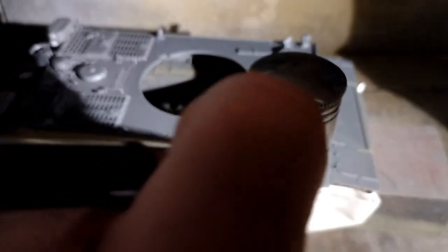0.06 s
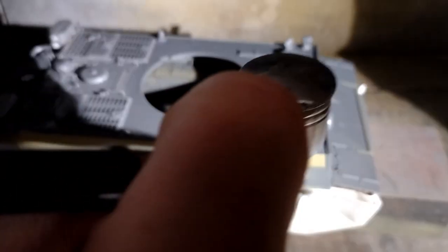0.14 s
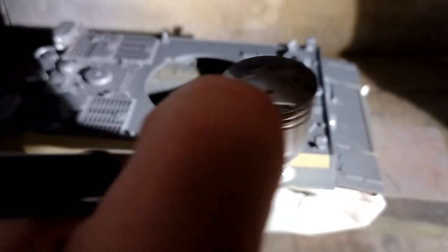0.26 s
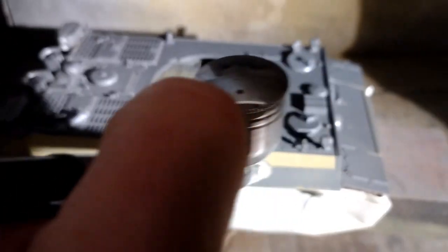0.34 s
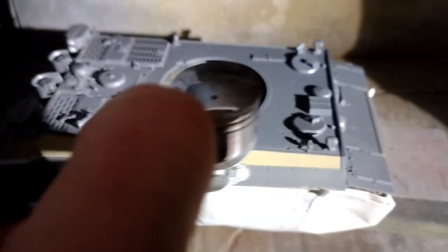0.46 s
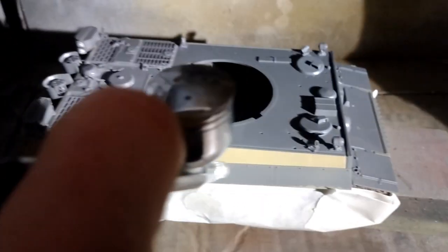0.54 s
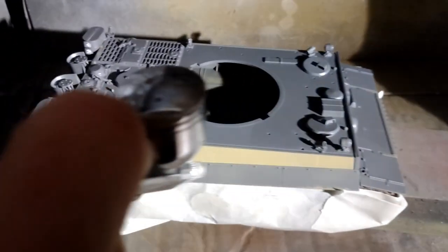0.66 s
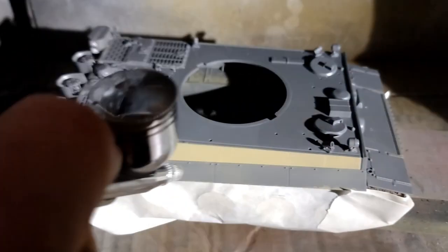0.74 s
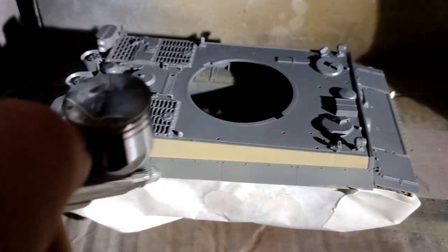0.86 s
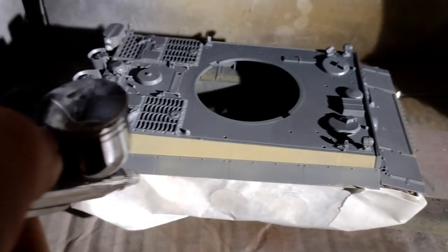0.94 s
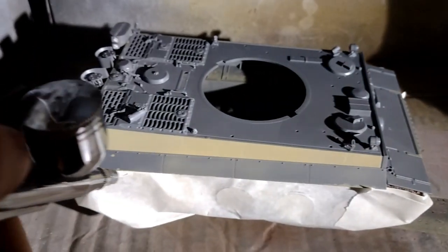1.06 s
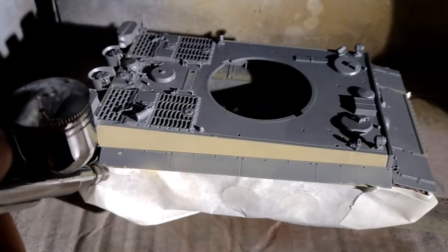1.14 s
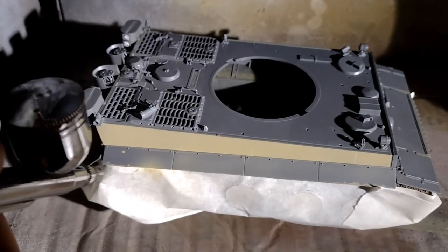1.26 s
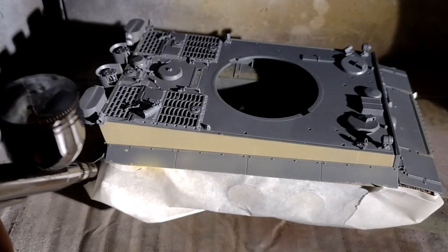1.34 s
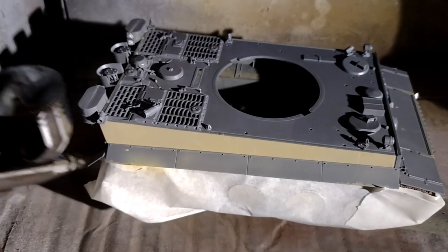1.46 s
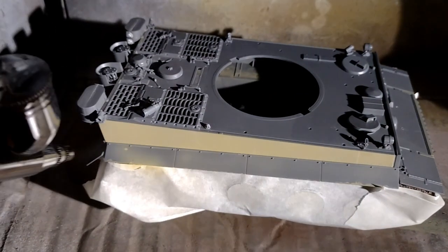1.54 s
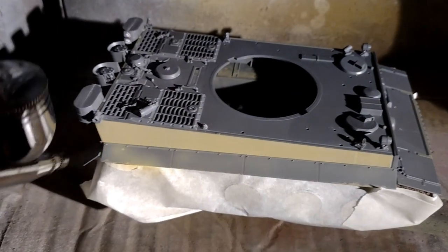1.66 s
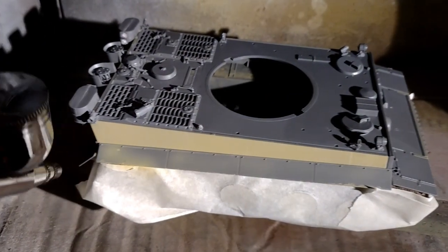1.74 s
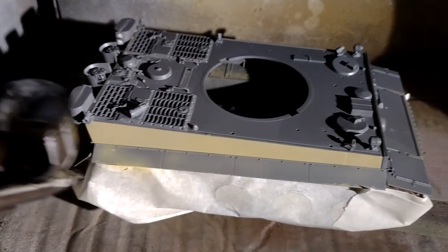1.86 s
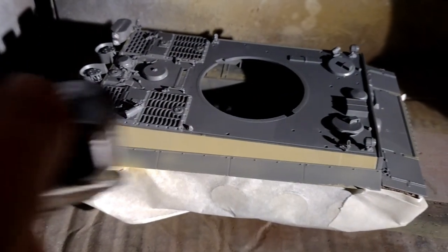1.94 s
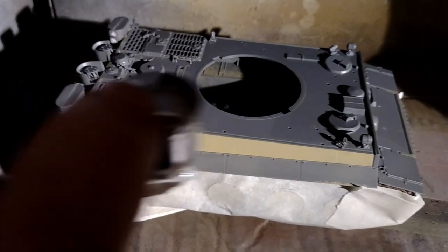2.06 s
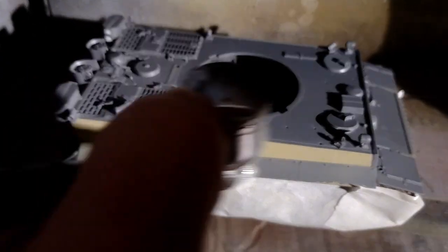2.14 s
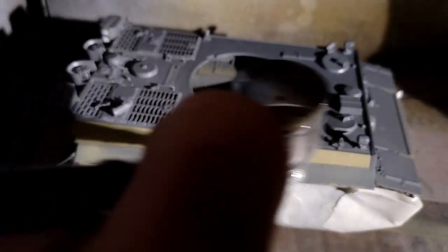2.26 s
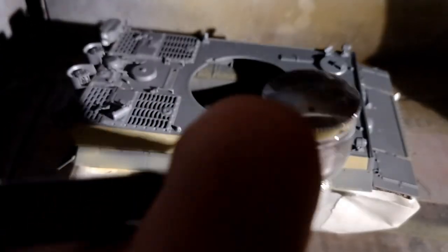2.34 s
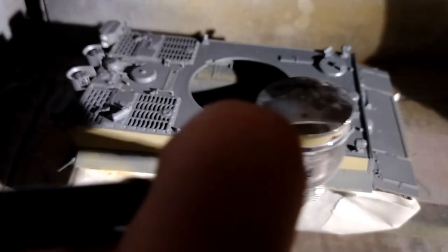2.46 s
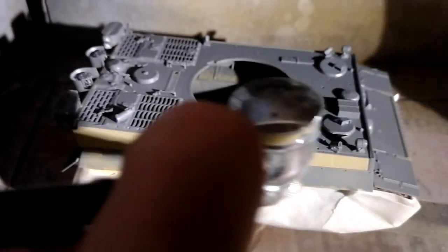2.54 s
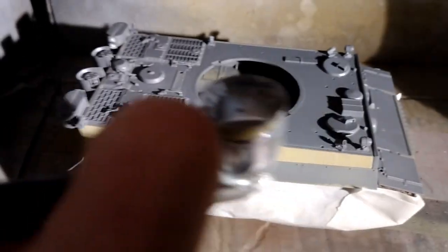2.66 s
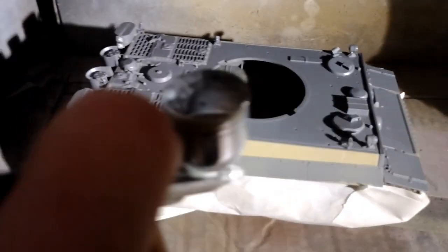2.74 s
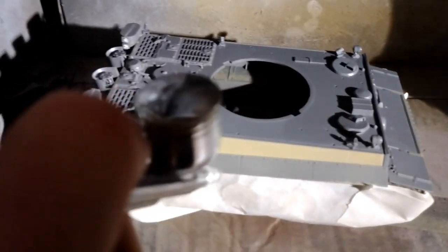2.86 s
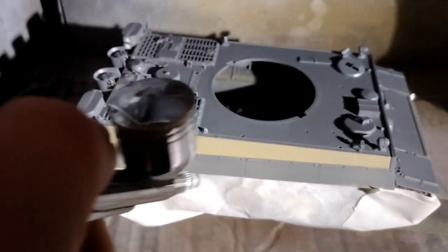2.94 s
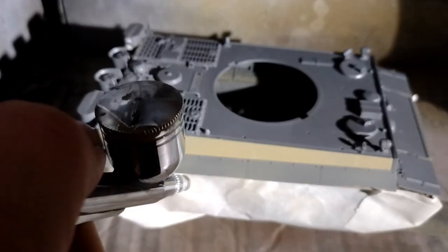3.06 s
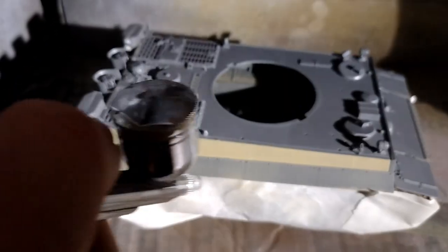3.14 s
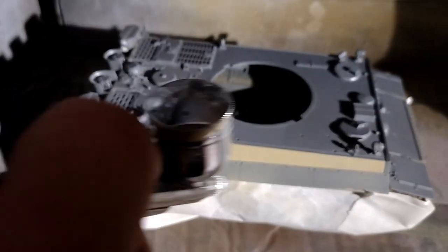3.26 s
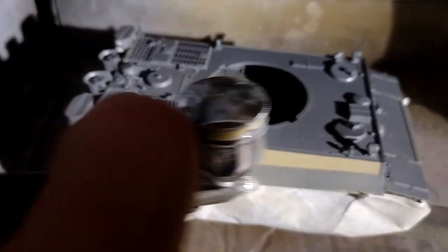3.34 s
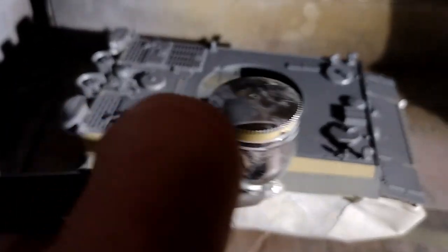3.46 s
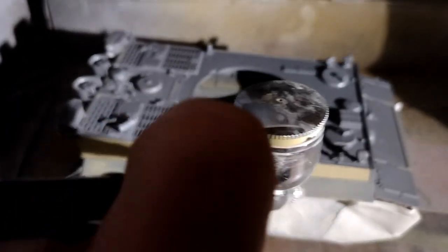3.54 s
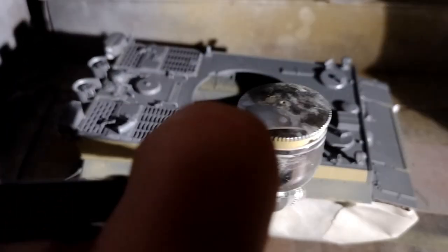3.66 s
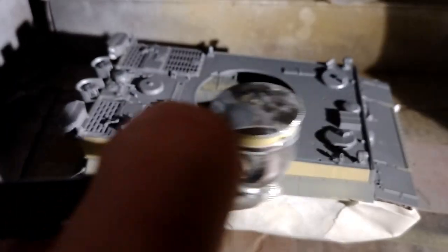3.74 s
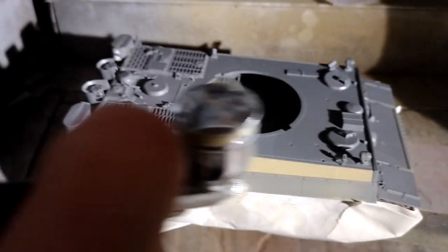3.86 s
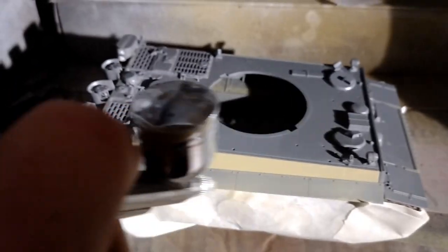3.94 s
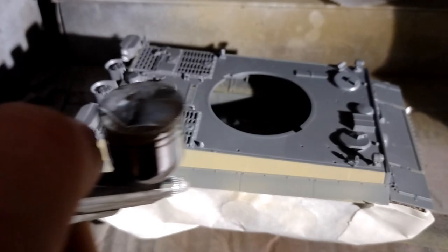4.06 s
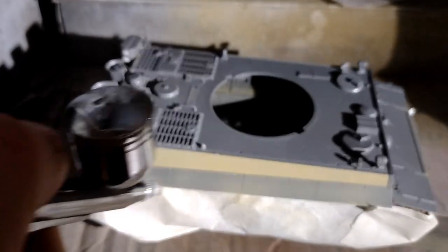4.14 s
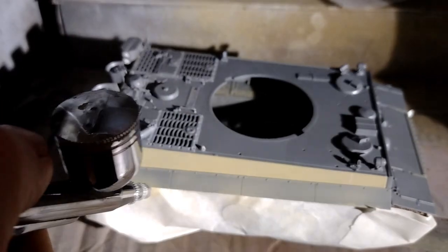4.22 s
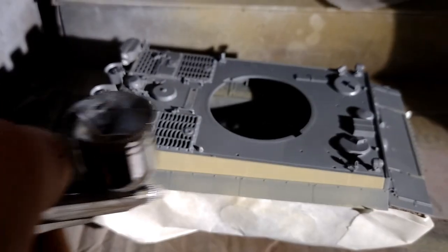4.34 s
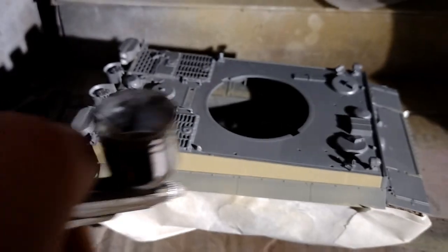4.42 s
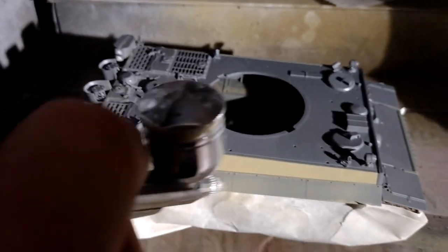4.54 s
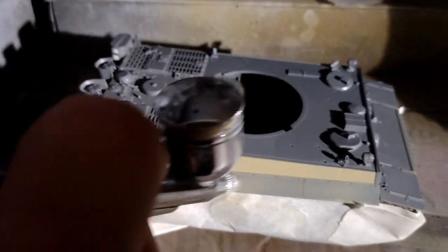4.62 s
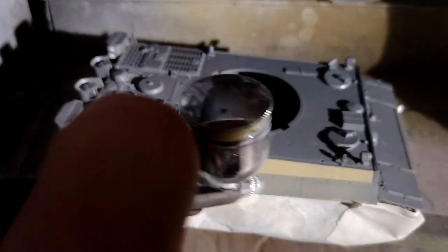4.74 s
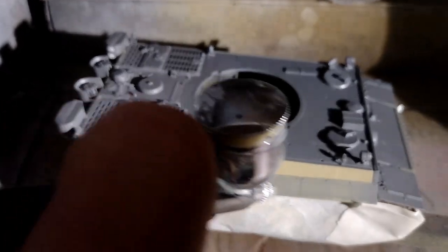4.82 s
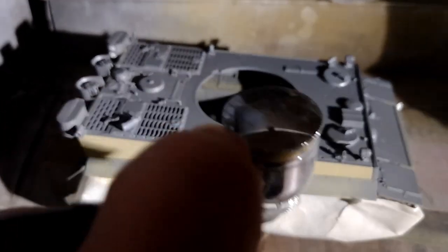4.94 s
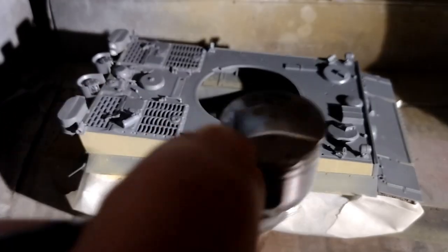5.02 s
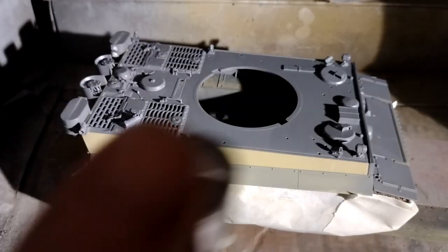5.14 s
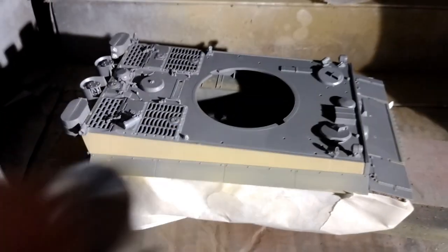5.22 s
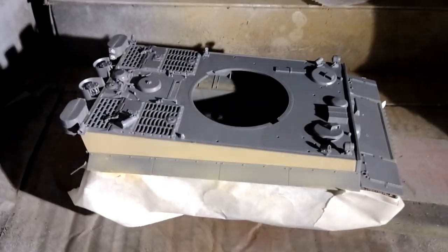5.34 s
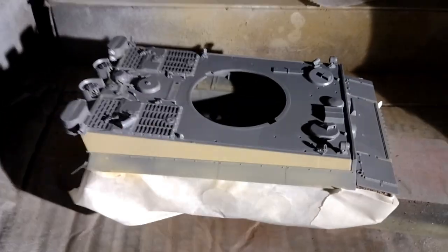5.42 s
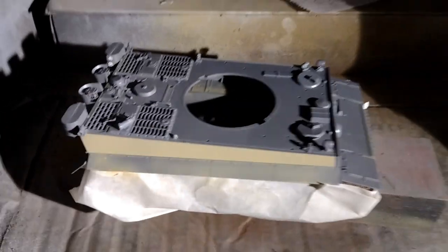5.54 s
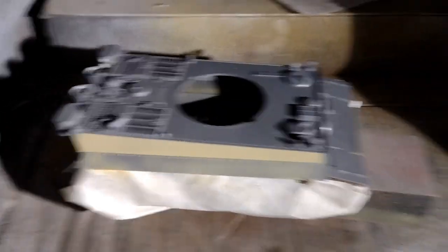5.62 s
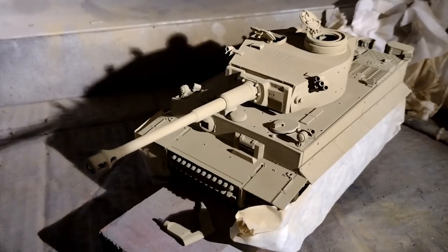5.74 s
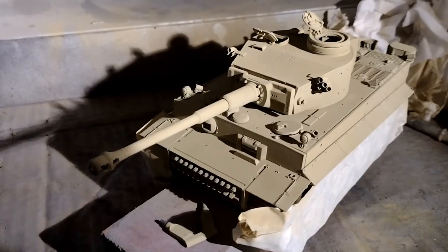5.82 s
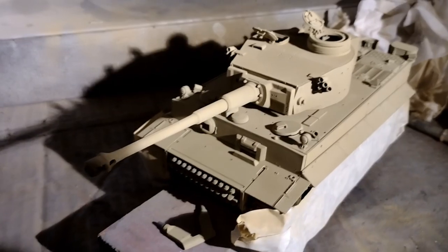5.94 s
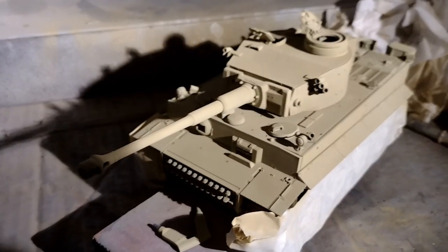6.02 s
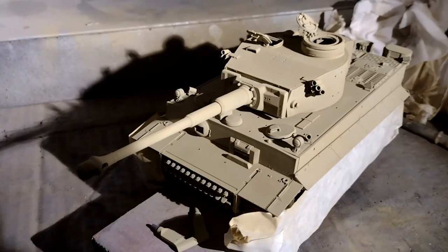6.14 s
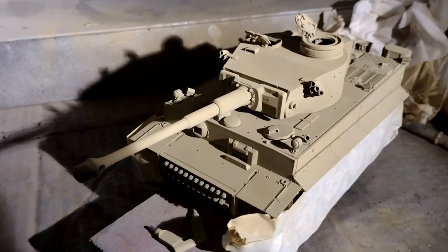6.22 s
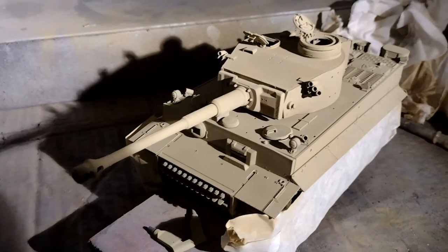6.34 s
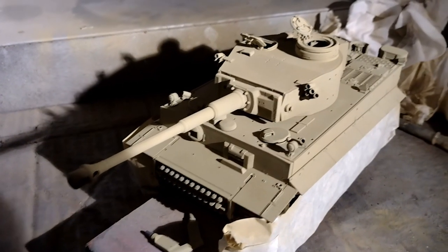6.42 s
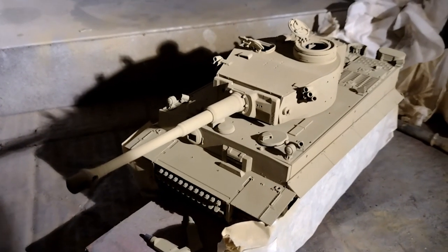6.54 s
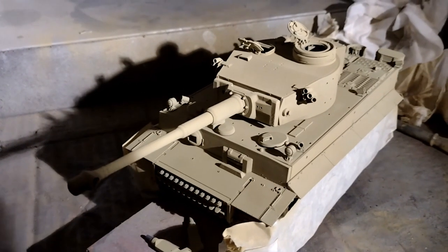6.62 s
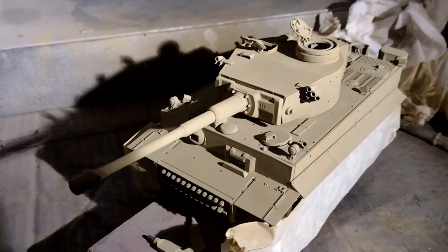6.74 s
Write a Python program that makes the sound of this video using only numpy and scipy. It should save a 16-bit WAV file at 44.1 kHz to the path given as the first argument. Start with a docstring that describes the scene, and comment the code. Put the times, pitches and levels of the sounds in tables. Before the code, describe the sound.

A low, fast, throbbing compressor runs alone for an instant before an airbrush opens with a small spurt, hissing sharply close by. It stops, the chugging stands out, a soft valve thump comes, and a longer spray follows with wavering force. After it shuts off, a brief dead gap leads to a hushed bench: light handling, sliding fingers, small clicks and a sudden sharp clack echoing shortly in the room.

```python
"""A piston compressor chugs from the start: each turn rings housing, tank and valve plate and gulps air.
Close up, an airbrush paints a plastic model in two passes. The nozzle hisses, the spray rushes, and the jet
roars on the model, shifting in pitch with its force and over an edge; the chugging sinks under loud spray.
Soft bumps fall amid the spraying, one as the valve thumps. Then comes a silent cut, and the quiet room fades
up with a faint hum: handling, sliding fingers, small ticks, and one hard clack that knocks, snaps and rings."""
import sys
import numpy as np
from scipy import signal
from scipy.fft import rfft, irfft, next_fast_len
from scipy.io import wavfile
from scipy.ndimage import uniform_filter1d, map_coordinates

SR = 44100
rng = np.random.default_rng(int(sys.argv[2]) if len(sys.argv) > 2 else 0)


def materialize(psi):
    """Save the field psi as 16-bit PCM at rate SR to the path in sys.argv[1].

    A 1-D psi becomes a single channel; in a 2-D psi each row is a channel.
    """
    bounded = np.clip(np.atleast_2d(psi).T, -1, 1)
    quanta = np.round(bounded * 32767).astype(np.int16)
    wavfile.write(sys.argv[1], SR, quanta)


N = 298998
T = np.arange(N) / SR

# mean compressor speed: t/s, speed/(turns per s)
PUMP_SPEED = [(0, 21.03), (2.15, 21.03), (2.3, 20.8), (2.9, 20.8), (3.1, 21.03), (5.6, 21.03)]
# pump strokes in each turn: place in the turn/0-1, housing level/dB, tank level/dB, valve plate level/dB
PUMP_STROKES = [(.67, 0, -4, -3), (.015, -.5, 0, -14), (.22, -24, -5, 0), (.47, -30, -3, -1)]
# ringing modes of the pump housing: f/Hz, level/dB, t60/s
HOUSING_MODES = [(335, 0, .05)]
# ringing modes of the air tank: f/Hz, level/dB, t60/s
TANK_MODES = [(65, -7, 0.36), (120.2, 4, 0.14), (149, -2, 0.45), (187, 2, 0.099)]
# ringing modes of the valve plate: f/Hz, level/dB, t60/s
PLATE_MODES = [(474.5, -8, 0.11), (686, -15, .03), (819, 1.5, 0.043), (897, 4.5, 0.077), (950, 0, 0.059)]
# colour of the air drawn through the pump: f/Hz, level per Hz/dB
INTAKE_COLOUR = [(300, -36), (480, -8.5), (730, -7), (930, -21), (1120, -19), (1700, -15.5), (2300, -16),
                 (2800, -31), (3600, -29), (4300, -37), (5600, -32.5), (8500, -31.5), (12000, -37.5),
                 (15600, -40.5)]
# spray passes: trigger pressed t/s, trigger released t/s, roar centre on a flat face f/Hz
TRIGGER_PASSES = [(0.107, 1.852, 1488), (2.324, 5.152, 1496)]
# colour of the jet, one list a pass: f/Hz, level per Hz/dB
JET_COLOURS = [
    [(1470, -15.5), (2500, -7.5), (3070, -6.5), (3530, -9), (4020, -3), (6030, -3.5), (7360, 1),
     (8710, -2.5), (10900, 1), (13500, -1), (15600, -1)],
    [(1470, -30), (2500, -8.5), (3290, -8.5), (4020, -4.5), (5810, -4), (6510, 0.5), (9340, -3),
     (12700, -0.5), (13900, 0.5), (15600, 1)],
]
# resonances of bench and model under the jet: f/Hz, width/Hz, level/dB
BENCH_RESONANCES = [(570, 112, 9), (939, 69, 1), (1165, 37, -0.5), (1386, 270, -5.5), (1900, 160, -6),
                    (2177, 150, -4.5), (3000, 790, -7)]
# left-right likeness of noise sources: f/Hz, coherence/0-1
STEREO_COHERENCE = [(300, 0.51), (1400, 0.67), (3100, 0.28), (6000, 0.02)]
# how hard the jet strikes the model, one list a pass: t/s, roar level/dB, roar left minus right/dB
JET_IMPACT = [
    [(0.14, -28.5, -1.0), (0.196, -33.5, 2), (0.388, -31, -0.5), (0.944, -33.5, -6), (1.02, -27, -7.5),
     (1.136, -25, -1.5), (1.198, -23.5, -6), (1.316, -30.5, -7), (1.552, -34.5, -3), (1.566, -30.5, -7.5),
     (1.706, -35, -10.5), (1.83, -33.5, -5.0)],
    [(2.35, -33.5, -1.5), (2.64, -26.5, -1.5), (2.91, -31, -5), (3.05, -25, -5.5), (3.34, -27.5, -5.0),
     (3.39, -29.5, -7.5), (3.44, -30, -2), (3.6, -32, -7), (3.71, -31.5, -3.0), (4.02, -34, -4.0),
     (4.08, -29.5, -6), (4.17, -34, -4.0), (4.24, -28, -9), (4.37, -29.5, -3.5), (4.74, -33, -8.5),
     (4.8, -34.5, -7), (5.06, -33, -3.5), (5.13, -33, -0.5)],
]
# the nozzle, one list a pass: t/s, hiss level before trim/dB, top treble against the whole hiss/dB
NOZZLE_HISS = [
    [(0.16, -27.5, -3), (0.384, -25.5, -3.5), (0.866, -24.5, -4), (1.216, -30, -2), (1.81, -29.5, -3)],
    [(2.36, -22.5, -5), (2.68, -27, -4.5), (2.83, -26, -4.5), (3.21, -27.5, -3), (3.6, -26, -5),
     (3.78, -23.5, -5.5), (3.91, -28.5, -4), (4.09, -23, -3), (4.13, -29, -2.5), (4.23, -25, -4.5),
     (4.6, -27, -3), (4.69, -24.5, -3.5), (4.98, -26.5, -5.5), (5.12, -26, -5)],
]
# the jet slips over the end of the hull in the first pass: t/s, share of the jet on the edge/0-1
HULL_EDGE = [(1.1, 0.26), (1.19, 0.6), (1.25, 0.9), (1.38, 0.6), (1.5, 1), (1.85, 1), (2.1, 0)]
# diffuse answer of the workshop: f/Hz, t60/s
ROOM_DECAY = [(200, 0.2), (2000, 0.18), (8000, 0.19), (15000, 0.26)]
# soft bumps: handling, the valve's thump at 2.338 s, the clack's low body at 6.207 s:
# t/s, level/dB, pitch f/Hz, t60/s
SOFT_BUMPS = [(0.665, -39, 190, 0.06), (1.345, -33, 200, 0.046), (2.338, -30.5, 540, 0.037),
              (5.975, -48, 135, .06), (6.024, -49.5, 600, .08), (6.053, -45, 520, 0.098),
              (6.082, -47, 480, 0.16), (6.109, -54, 716, .05), (6.154, -49, 710, 0.27),
              (6.207, -42.5, 290, .09), (6.396, -53, 824, .06), (6.571, -49, 330, .03),
              (6.572, -53.5, 1550, 0.04)]
# small hard ticks: t/s, level/dB
HARD_TICKS = [(5.9343, -54), (5.973, -47), (6.078, -49), (6.3685, -32), (6.389, -32.5), (6.588, -59)]
# fingers slide on the bench: peak t/s, level/dB, rise/s
FINGER_SLIDES = [(5.99, -53.5, 0.036), (6.04, -52, 0.0086), (6.19, -48.5, 0.034), (6.53, -65.5, .03)]
# the silent cut: last of the spraying t/s, first of the quiet bench t/s
SILENT_CUT = (5.602, 5.842)
# colour of the quiet room: f/Hz, level per Hz/dB
QUIET_COLOUR = [(25, -23), (60, -11), (100, -7), (170, -12.5), (300, -14), (500, -22.5), (1200, -24.5),
                (3000, -26), (7000, -24.5), (15600, -34)]
# modes of the knock that leads into the clack: f/Hz, level/dB, t60/s
KNOCK_MODES = [(720, -0.5, 0.048), (820, -4, 0.042), (2110, -7, 0.05)]
# colour of the ring after the clack: f/Hz, level per Hz/dB
CLACK_COLOUR = [(88, -51), (150, -30), (320, -4), (389, -19), (510, -7.5), (862, -8.5), (950, -6),
                (1370, -17.5), (2070, 0.5), (2320, -5.5), (2770, -3.5), (2990, -11), (3300, -7), (5790, -6),
                (15600, -17.5)]
# decay of the ring after the clack: f/Hz, t60/s
CLACK_DECAY = [(200, 0.23), (800, 0.32), (2200, 0.27), (6000, 0.3), (14000, 0.17)]

# chugging before it sinks (dB); spray mid-band level where sinking starts (dB); slope (dB per dB)
CHUG_DB, SINK_FROM_DB, SINK_SLOPE = -40, -33, 0.69
# reference levels for the jet on a flat face: roar, hiss before trim, top treble, rush (dB)
FLAT_ROAR_DB, FLAT_HISS_DB, FLAT_TOP_DB, FLAT_RUSH_DB = -30, -26, -4.5, -28.5
# a harder impact raises the roar's pitch (octaves per dB)
RISE_OCT_PER_DB = .015
# the rush follows roar and hiss (dB per dB)
RUSH_PER_ROAR, RUSH_PER_HISS = 0.32, .3
# base placing to the right (left minus right, dB); the rush swings with the roar (dB per dB)
HISS_PAN_DB, RUSH_PAN_DB, RUSH_SWING = -5, -11.5, .9
# fully on the edge: roar pitch up (octaves), rush up (dB), hiss turned to the left (dB)
EDGE_OCTAVES, EDGE_RUSH_DB, EDGE_TURN_DB = .5, 6, 4
# the edge raises a broad hump in the rush: centre (Hz), width (octaves), height (dB)
EDGE_HZ, EDGE_WIDTH_OCT, EDGE_HUMP_DB = 2900, 0.65, 7.5
TICK_HZ, TICK_T60_S = 8400, 0.04
SLIDE_RELEASE_S = 0.044  # time constant
# the quiet room: level (dB), time constant of its rise after the cut (s)
FLOOR_DB, FLOOR_RISE_S = -68, .08
TOP_HZ = 15760  # band limit


def amp(db):
    """Decibels to gain."""
    return 10 ** (np.asarray(db) / 20)


def unit(x):
    """Scale so that the mean of the channels has rms 1."""
    return x / np.sqrt(np.mean(np.atleast_2d(x).mean(axis=0) ** 2) + 1e-20)


def along(points, hz):
    """Read (Hz, value) points on a log frequency axis."""
    f, v = np.transpose(points)
    return np.interp(np.log(hz + 1), np.log(f + 1), v)


def curves(rows, t=T):
    """Read each column after the time at times t."""
    s, *cols = np.transpose(rows)
    return [np.interp(t, s, c) for c in cols]


def filtered(x, response):
    """Shape x by a response of frequency."""
    m = next_fast_len(N + SR // 4)
    return irfft(rfft(x, m) * response(np.fft.rfftfreq(m, 1 / SR)), m)[..., :N]


def pan(db):
    """Left and right gains for a level difference, of mean power 1."""
    g = np.array([amp(db / 2), amp(-db / 2)])
    g = g / np.sqrt(np.mean(g ** 2, axis=0))
    return g if g.ndim > 1 else g[:, None]


def noise(gain):
    """Coloured stereo noise of mid rms 1, more alike in the bass than in the treble."""
    def mid_side_gain(hz):
        angle = np.arccos(np.clip(along(STEREO_COHERENCE, hz), -1, 1)) / 2
        return gain(hz) * np.array([np.ones_like(hz), np.tan(angle)])

    mid, side = filtered(rng.standard_normal((2, N)), mid_side_gain)
    return unit(np.array([mid + side, mid - side]))


def bell(hz, centre, octaves):
    """A hump of gain around a centre frequency."""
    return 1 / (1 + (np.log2((hz + 1) / centre) / octaves) ** 2)


def drift(hz, t, width_hz, rate):
    """A smooth random field over frequency and time."""
    knots = rng.standard_normal((64, 96))
    return map_coordinates(knots, np.broadcast_arrays(hz / width_hz, t * rate), mode="mirror")


def morph(x, gain):
    """Recolour steady noise by gain(Hz, s), holding its expected power."""
    hz, t, z = signal.stft(x, SR, nperseg=512)
    g = gain(hz[:, None], t)
    power = np.mean(np.abs(z.mean(axis=0)) ** 2, axis=1, keepdims=True)
    g = g / np.sqrt(np.sum(power * g ** 2, axis=0) / power.sum())
    return signal.istft(z * g, SR, nperseg=512)[1][:, :N]


def dying(x, t60s):
    """Let each frequency of x die at its own speed."""
    hz, t, z = signal.stft(x, SR, nperseg=256)
    return signal.istft(z * amp(-60 * t / along(t60s, hz)[:, None]), SR, nperseg=256)[1]


def fade(start, t60, attack):
    """Envelope of a blow: quick rise, exponential fall."""
    age = np.maximum(T - start, 0)
    return (1 - np.exp(-age / attack)) * amp(-60 * np.minimum(age / t60, 3))


def follow(x, up, down):
    """Track x, with one step size going up and another coming down."""
    y = [0]
    for value in x:
        step = min(up if value > y[-1] else down, 1)
        y.append(y[-1] + (value - y[-1]) * step)
    return np.array(y[1:])


def struck(times, blows_db, modes, scatter_db, attack, spread=0.16):
    """Blows swell a set of modes; each mode reaches the two microphones out of step."""
    t, out = np.arange(SR // 4) / SR, np.zeros((2, N))
    for k, (hz, db, t60) in enumerate(modes):
        sizes = amp(blows_db + scatter_db * rng.standard_normal(len(times)))
        train = np.bincount(np.clip(times * SR, 0, N).astype(int), sizes, N + 1)[:N]
        # opposite phase leads (rad) left and right, swapped from mode to mode
        phase = (-1) ** k * spread * np.array([[1], [-1]])
        envelope = amp(db - 60 * t / t60) * (1 - np.exp(-(t / attack) ** 2))
        ring = envelope * np.sin(2 * np.pi * hz * t + phase)
        out += signal.oaconvolve(train[None], ring, axes=1)[:, :N]
    return out


def compressor(housing_db=0.0, tank_db=-3, plate_db=-4.0, intake_db=-6, rumble_db=-9.5,
               flutter=0.21, hunting_turns=.012):
    """Each turn of the piston knocks the housing, the tank and the valve plate, and draws a gulp of air."""
    # the motor runs slightly ahead of and behind its mean speed
    hunting = hunting_turns * drift(0, T, width_hz=1, rate=5)
    turns = np.cumsum(curves(PUMP_SPEED)[0]) / SR + hunting
    whole = np.arange(int(turns[-1]) - 1)
    housing, tank, plate = np.zeros((3, 2, N))
    for place, on_housing, on_tank, on_plate in PUMP_STROKES:
        jitter = .00013 * rng.standard_normal(len(whole))  # s
        times = np.interp(whole + place, turns, T) + jitter
        housing += struck(times, on_housing, HOUSING_MODES, scatter_db=1, attack=.005)
        tank += struck(times, on_tank, TANK_MODES, scatter_db=1.3, attack=.007)
        plate += struck(times, on_plate, PLATE_MODES, scatter_db=1.6, attack=.004)
    body = amp(housing_db) * unit(housing) + amp(tank_db) * unit(tank) + amp(plate_db) * unit(plate)
    gulps = 1 + flutter * np.cos(2 * np.pi * (turns - .3))
    intake = amp(intake_db) * gulps * noise(lambda hz: amp(along(INTAKE_COLOUR, hz)))
    rumble = amp(rumble_db) * noise(lambda hz: bell(hz, 210, 1.1) ** 2)
    return amp(CHUG_DB) * (body + rumble + intake) * pan(db=-3)


def airbrush(split_hz=8300, hiss_trim_db=3.5, roar_octaves=1.0, sharp_hz=14300, sharpening=3.8,
             spurt_db=3, opening_s=0.013, closing_s=0.0016):
    """The valve opens with a spurt; the jet hisses at the nozzle, rushes as spray and roars on the model."""
    out = np.zeros((2, N))
    edge = curves(HULL_EDGE)[0]

    def upper(hz):
        """Share of the jet's power that goes to the hiss; the rush takes the rest."""
        return 1 / (1 + (split_hz / (hz + 1)) ** 12)

    def bench(hz):
        """Summed power of the bench and model resonances, as gain."""
        return np.sqrt(sum(amp(db) ** 2 * (hz * w) ** 2 / ((c * c - hz * hz) ** 2 + (hz * w) ** 2)
                           for c, w, db in BENCH_RESONANCES))

    def patches_db(hz, t):
        """Random drifting patches, a few dB deep, colour the hiss and rush."""
        return 1.5 * drift(hz, t, width_hz=480, rate=6)

    passes = zip(TRIGGER_PASSES, JET_IMPACT, NOZZLE_HISS, JET_COLOURS)
    for (press, release, roar_hz), impact, nozzle, colour in passes:
        roar_level, roar_pan = curves(impact)
        hiss_level, top_level = curves(nozzle)
        force_db = roar_level - FLAT_ROAR_DB
        rush_level = FLAT_RUSH_DB + RUSH_PER_ROAR * force_db + EDGE_RUSH_DB * edge
        rush_level = rush_level + RUSH_PER_HISS * (hiss_level - FLAT_HISS_DB)

        sharp_db = sharpening * (top_level - FLAT_TOP_DB)
        hiss = noise(lambda hz: amp(along(colour, hz)) * np.sqrt(upper(hz)))
        hiss = morph(hiss, lambda hz, t: amp(
            np.interp(t, T, sharp_db) * bell(hz, sharp_hz, 0.15) + patches_db(hz, t)))

        hump_db = EDGE_HUMP_DB * edge
        rush = noise(lambda hz: amp(along(colour, hz)) * np.sqrt(1 - upper(hz)))
        rush = morph(rush, lambda hz, t: amp(
            np.interp(t, T, hump_db) * bell(hz, EDGE_HZ, EDGE_WIDTH_OCT) + patches_db(hz, t)))

        # the roar rises in pitch as the jet strikes harder or meets an edge
        centre = roar_hz * 2 ** (RISE_OCT_PER_DB * force_db + EDGE_OCTAVES * edge)
        roar = morph(noise(bench), lambda hz, t: bell(hz, np.interp(t, T, centre), roar_octaves) ** 2)

        air = hiss * amp(hiss_level + hiss_trim_db) * pan(HISS_PAN_DB + EDGE_TURN_DB * edge)
        air = air + rush * amp(rush_level) * pan(RUSH_PAN_DB + RUSH_SWING * roar_pan)
        air = air + roar * amp(roar_level) * pan(roar_pan)
        opened = np.clip((T - press) / opening_s, 0, 1)
        valve = opened * np.exp(-np.maximum(T - release, 0) / closing_s)
        # pressure stored in the hose leaves first
        spurt = amp(spurt_db * fade(press, 0.085, 0.00087))
        out += air * valve * spurt
    return out


def sinking(spray, centre_hz=2600, onset_s=0.17, recovery_s=.06):
    """Gain that sinks slowly while the spray's middle band is loud on the right, and returns quickly."""
    hz, t, z = signal.stft(spray[1], SR, nperseg=1024)
    band = z * bell(hz, centre_hz, 1.0)[:, None]
    level = 10 * np.log10(np.sum(np.abs(band) ** 2, axis=0) + 1e-12)
    wanted_db = SINK_SLOPE * np.maximum(level - SINK_FROM_DB, 0)
    cut_db = follow(wanted_db, t[1] / onset_s, t[1] / recovery_s)
    return amp(-np.interp(T, t, cut_db))


def room(x):
    """The short diffuse answer of the workshop: decaying noise, 5 ms late, unrelated left and right."""
    tail = dying(rng.standard_normal((2, SR // 2)), ROOM_DECAY)
    tail = np.pad(tail / np.linalg.norm(tail[0]), ((0, 0), (SR // 200, 0)))
    return signal.fftconvolve(x.mean(axis=0)[None], tail, axes=1)[:, :N]


def taps(rows, octaves):
    """Brief contacts, each a damped noise burst around its own pitch."""
    out, t = np.zeros((2, N + SR)), np.arange(SR // 4) / SR
    hz = np.fft.rfftfreq(len(t), 1 / SR)
    for s, db, pitch, t60 in rows:
        spectra = rfft(rng.standard_normal((3, len(t)))) * bell(hz, pitch, octaves) ** 2
        shared, left, right = irfft(spectra, len(t))
        alike = np.clip(along(STEREO_COHERENCE, pitch), 0, 1)
        burst = unit(np.sqrt(alike) * shared + np.sqrt(1 - alike) * np.array([left, right]))
        envelope = amp(db - 60 * t / t60) * (1 - np.exp(-t / 0.00033))
        out[:, round(s * SR):][:, :len(t)] += burst * envelope
    return out[:, :N]


def bumps_ticks_and_slides(body_hz=680, body_db=4):
    """Soft bumps, ticks and the dry slide of fingers, which swells, dies away and stirs the bench."""
    bumps = taps(SOFT_BUMPS, octaves=.9)
    ticks = taps([(s, db, TICK_HZ, TICK_T60_S) for s, db in HARD_TICKS], octaves=0.7)
    strokes = sum(amp(db) * np.exp(-np.maximum((s - T) / rise, (T - s) / SLIDE_RELEASE_S))
                  for s, db, rise in FINGER_SLIDES)

    def rub_colour(hz):
        skin = bell(hz, 8800, 1.0) + 0.95 * bell(hz, 1500, 0.68)
        return skin + amp(body_db) * bell(hz, body_hz, .45) ** 2

    rub = noise(rub_colour) * strokes
    return (bumps + ticks + rub) * pan(db=-2)


def background(hum_hz=100, hum_db=-2):
    """Faint room noise with a low electric hum, rising after the cut."""
    hum = amp(hum_db) * np.sin(2 * np.pi * hum_hz * T)
    rise = 1 - np.exp(-np.maximum(T - SILENT_CUT[1], 0) / FLOOR_RISE_S)
    hush = noise(lambda hz: amp(along(QUIET_COLOUR, hz)))
    return amp(FLOOR_DB) * rise * (hush + hum) * pan(db=-2)


def clack(knock_at=6.2034, knock_db=-20, at=6.2062, crack_db=-9, ring_db=-22,
          boom_db=-58, boom_hz=90, boom_t60=0.7):
    """A dull knock, a hard snap just after it, then the bench booms softly and the walls ring on."""
    knock = struck(np.array([knock_at]), knock_db, KNOCK_MODES, scatter_db=0, attack=.0004)
    crack = noise(lambda hz: bell(hz, 5700, .42) ** 2) * amp(crack_db)
    crack = crack * fade(at, .014, .0007)
    tail = dying(noise(lambda hz: amp(along(CLACK_COLOUR, hz)))[:, :SR], CLACK_DECAY)
    ring = np.pad(tail, ((0, 0), (round(at * SR), 0)))[:, :N] * amp(ring_db)
    boom = noise(lambda hz: bell(hz, boom_hz, .35) ** 2) * amp(boom_db) * fade(at, boom_t60, .005)
    return knock * pan(db=2) + crack * pan(db=-5) + (ring + boom) * pan(db=-2.5)


def scene():
    """Spraying over the compressor, a silent cut, then the quiet bench."""
    chugging = compressor()
    spray = airbrush()
    near = spray + bumps_ticks_and_slides()
    # gates on either side of the cut, their edges softened over 90 samples
    gates = np.array([T < SILENT_CUT[0], T > SILENT_CUT[1]], float)
    before, after = uniform_filter1d(gates, size=90)
    bench = near + amp(-10) * room(near) + background() + clack()
    return bench * (before + after) + chugging * sinking(spray) * before


def record(dry, ceiling=0.95):
    """The loudest peaks are rounded off; nothing is kept above the band limit."""
    rounded = dry / (1 + np.abs(dry / ceiling) ** 6) ** (1 / 6)
    return filtered(rounded, lambda hz: np.clip((TOP_HZ - hz) / 200 + .5, 0, 1))


dry = scene()
out = record(dry)
materialize(out)
```